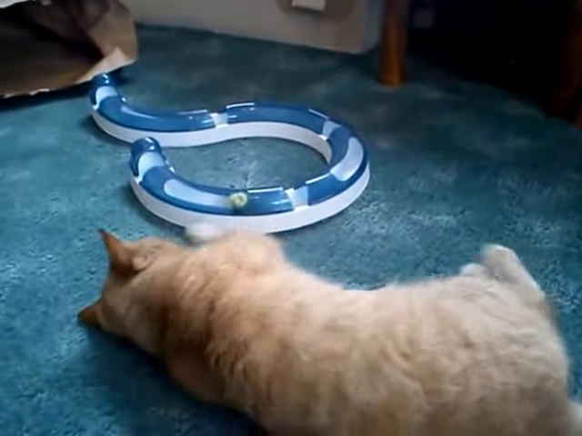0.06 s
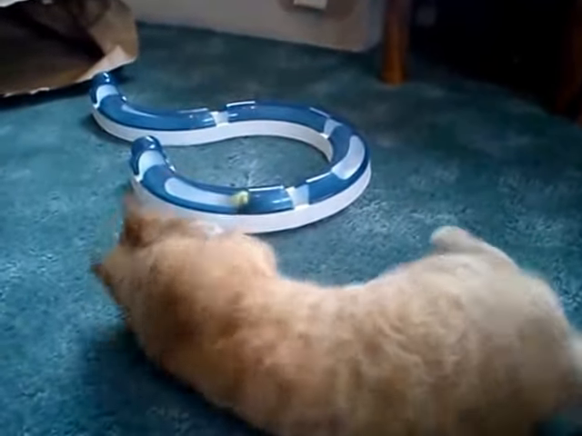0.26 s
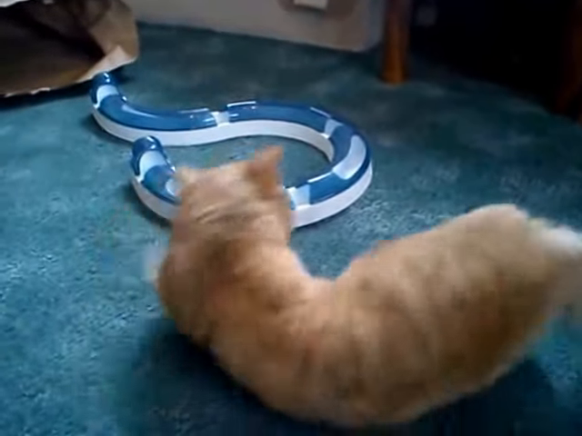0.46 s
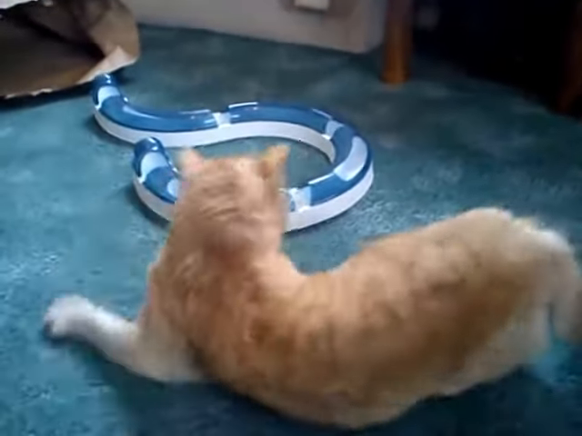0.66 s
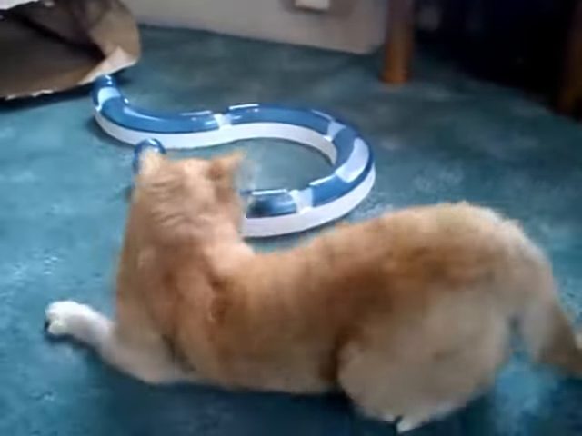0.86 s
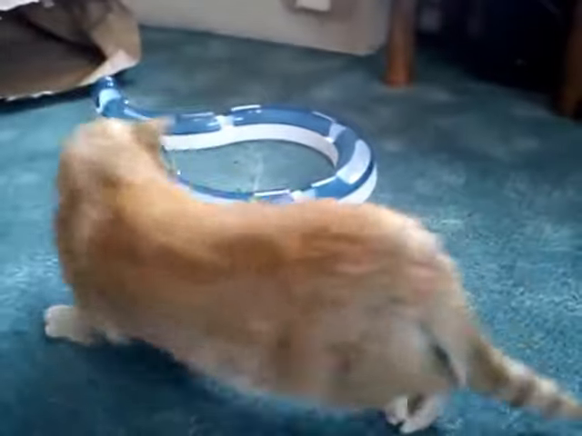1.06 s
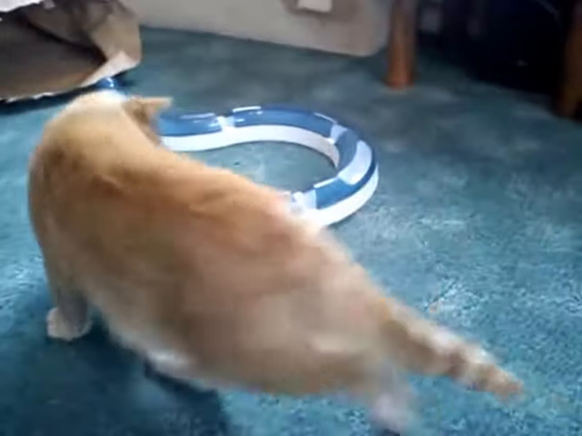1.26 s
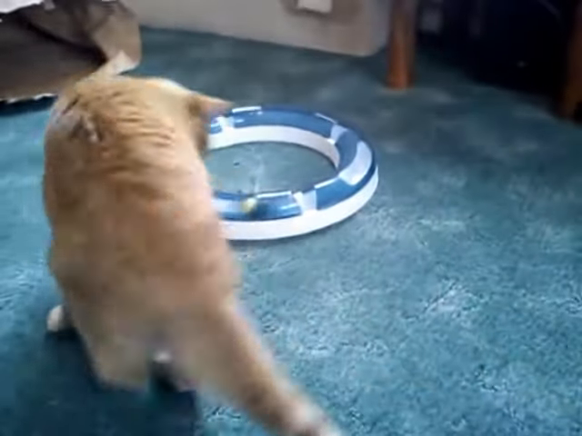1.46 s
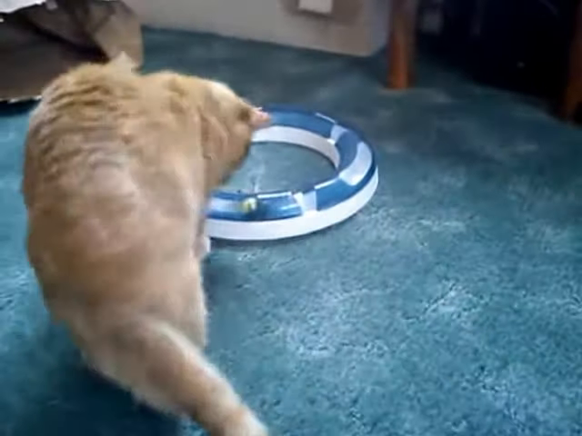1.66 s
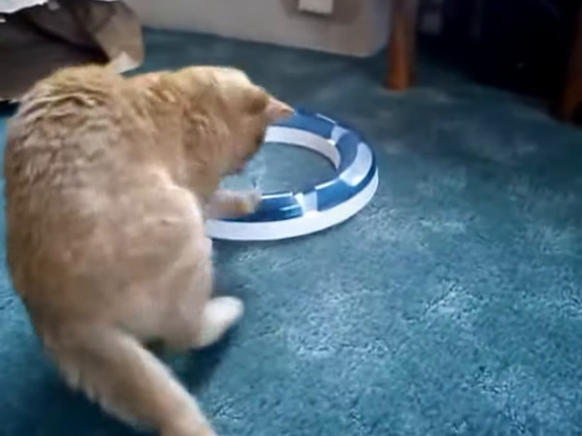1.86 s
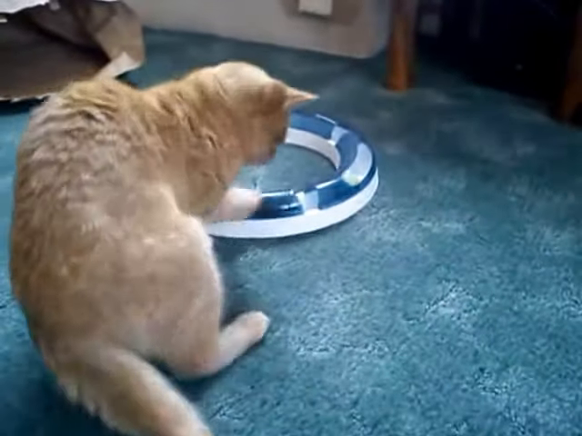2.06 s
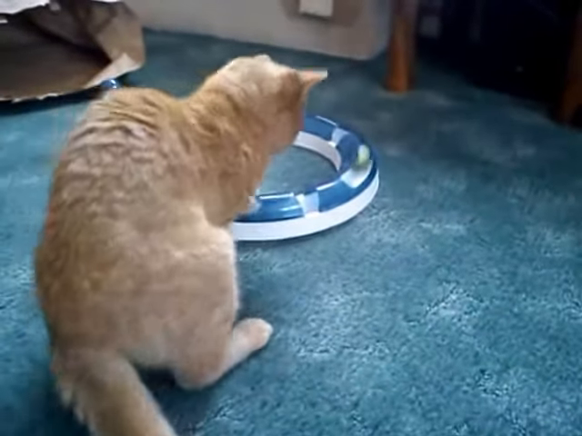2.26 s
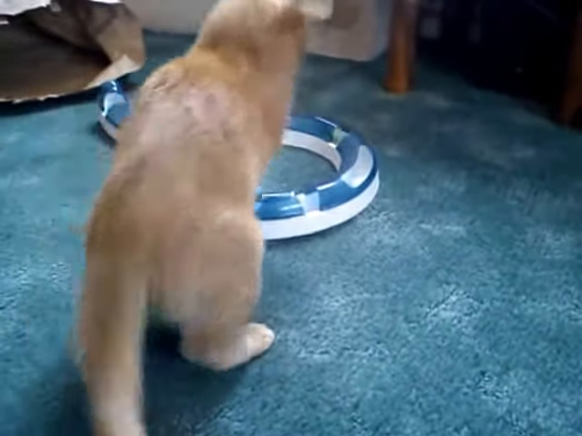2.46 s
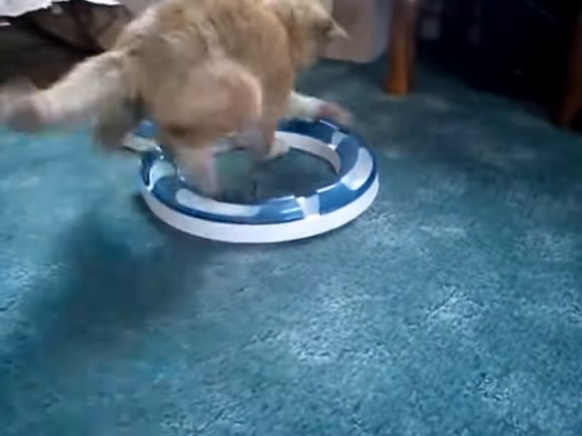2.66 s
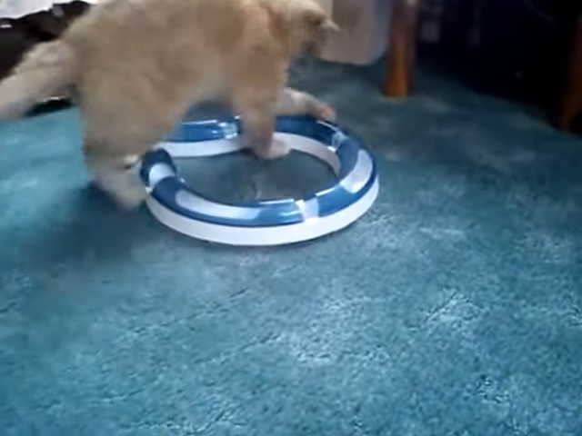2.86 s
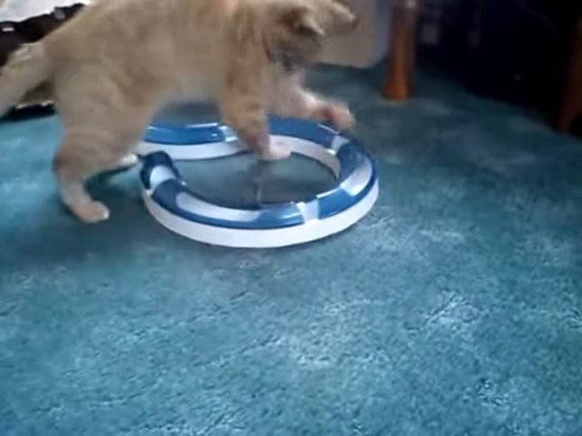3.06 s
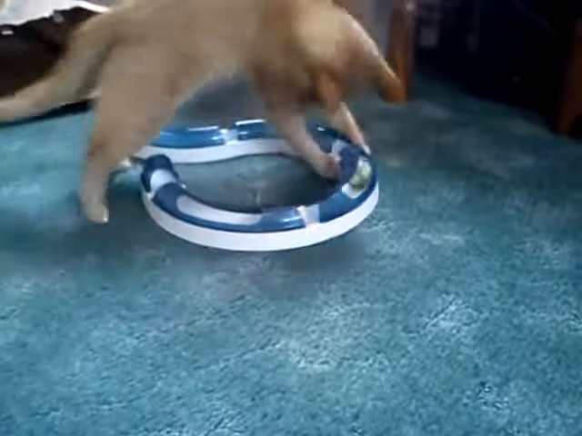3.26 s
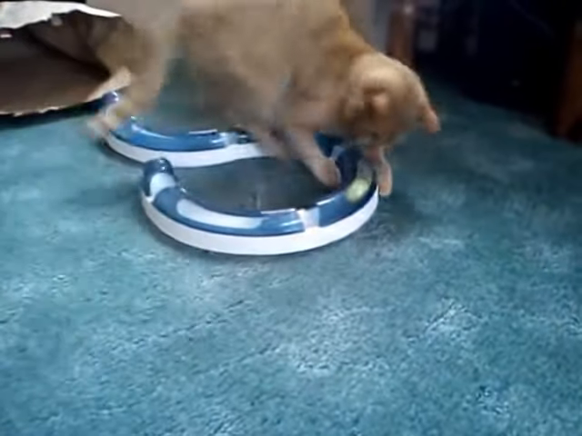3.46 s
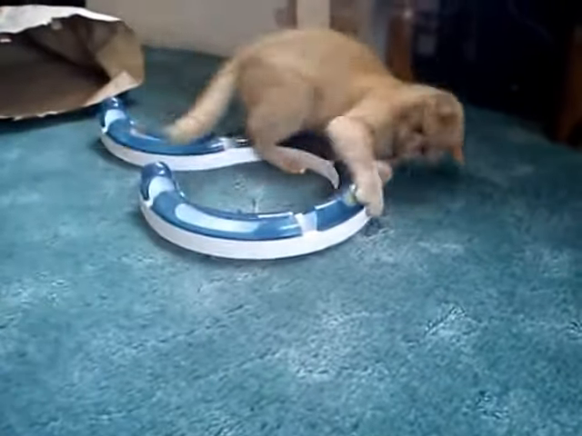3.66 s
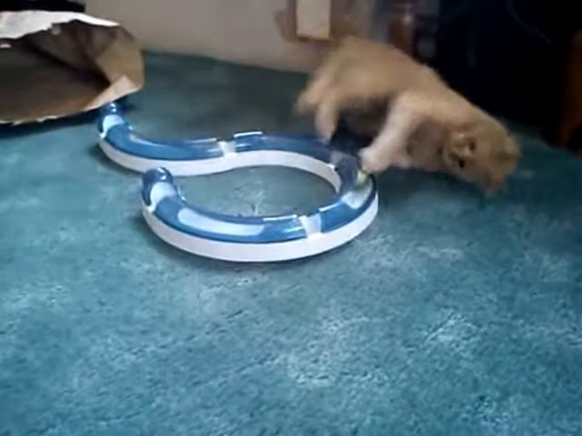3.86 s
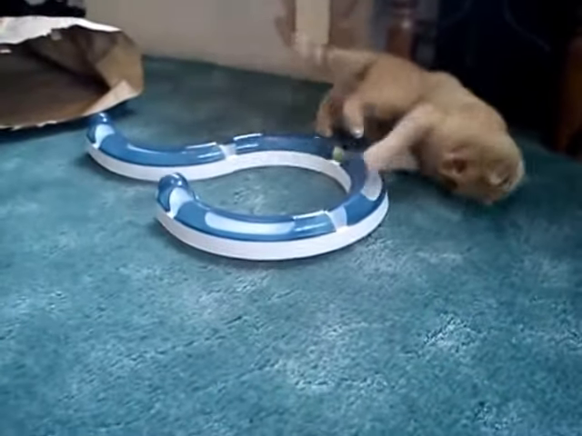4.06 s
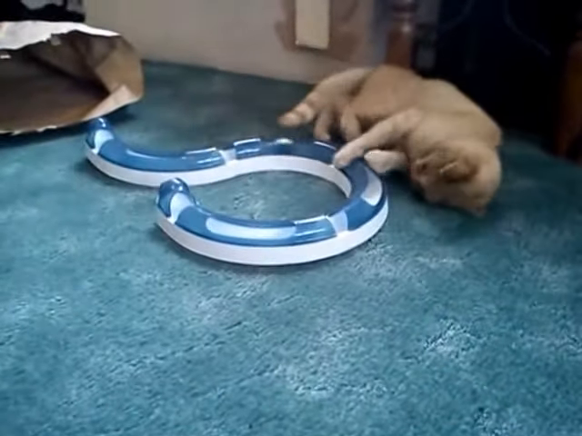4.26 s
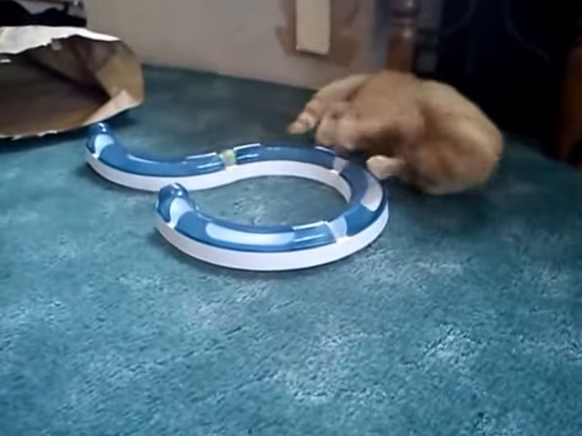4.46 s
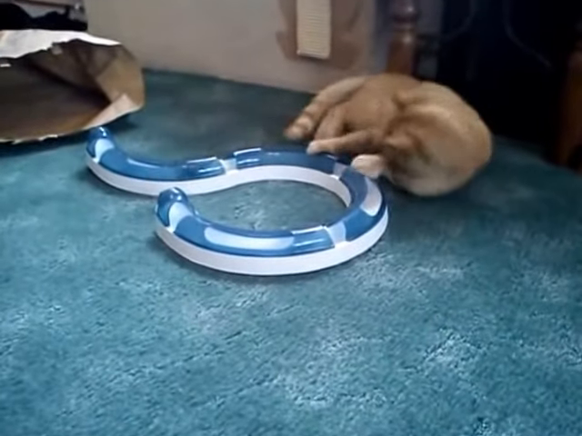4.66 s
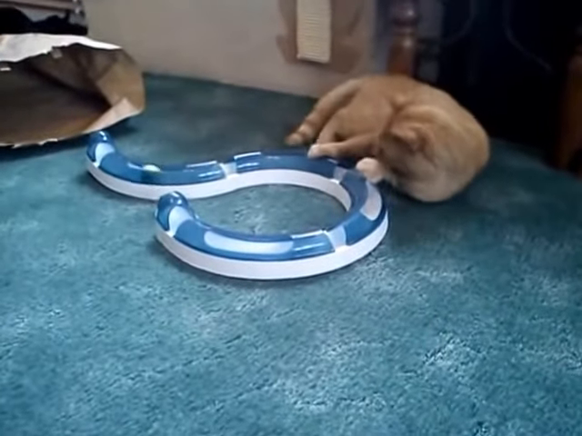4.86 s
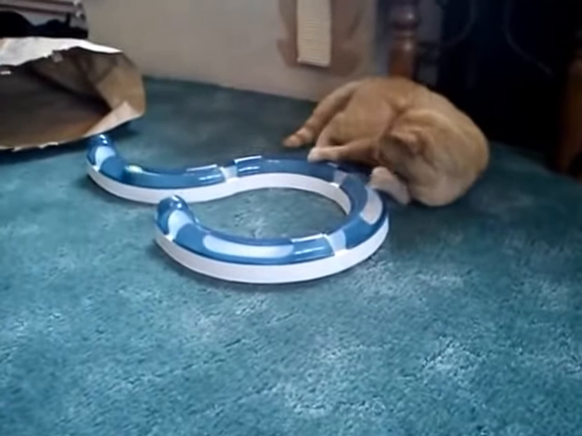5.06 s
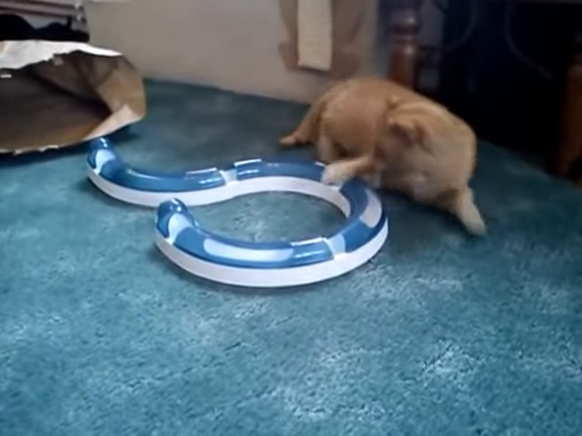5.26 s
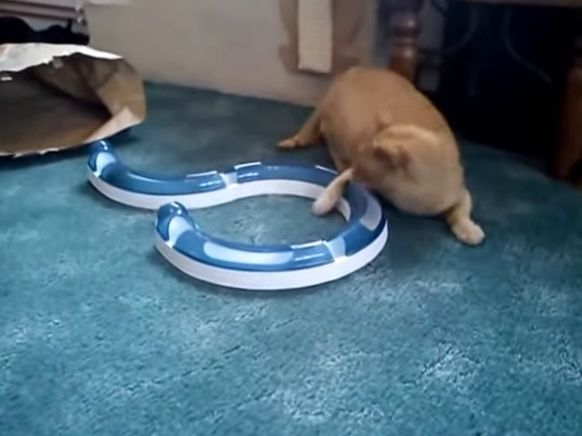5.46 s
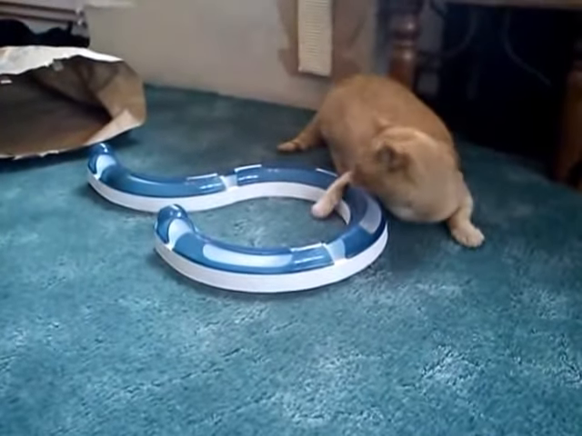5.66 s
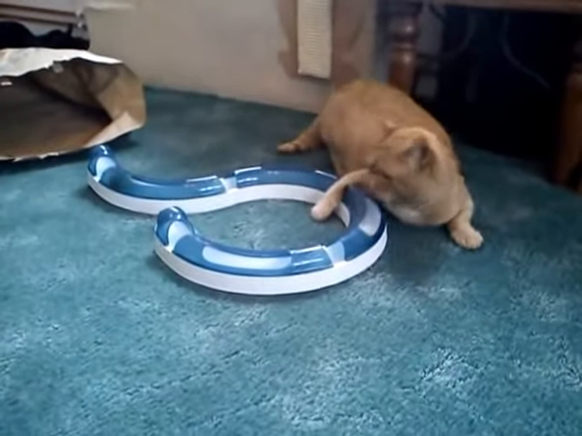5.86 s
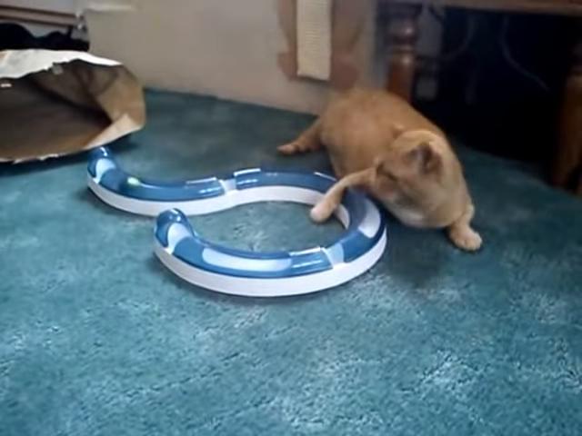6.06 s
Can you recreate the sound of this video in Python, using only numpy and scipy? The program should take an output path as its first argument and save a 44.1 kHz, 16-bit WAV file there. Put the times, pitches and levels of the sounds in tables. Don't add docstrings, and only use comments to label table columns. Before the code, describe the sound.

Steady microphone hiss and a faint low drone surround isolated plastic ticks and one early clack. After about two seconds, paw swats set a hard ball knocking and rattling through a thin plastic tube, its joints shaking. Strong cracks cluster midway, with muffled flops on carpet, then softer seam bumps trail off. Close, dry small-room sound, muffled above the midrange and distorted at peaks.

```python
import sys
import numpy as np
from scipy import signal
from scipy.fft import rfft, irfft
from scipy.io import wavfile
from scipy.ndimage import uniform_filter1d, minimum_filter1d

SR = 44100
rng = np.random.default_rng(int(sys.argv[2]) if len(sys.argv) > 2 else 0)


def elevation(decibels):
    levels = np.asarray(decibels, float)
    return 10 ** (levels / 20)


def transcribe(signal):
    frames = np.atleast_2d(signal).T
    limited = np.clip(frames, -1, 1)
    pcm = np.round(limited * 32767).astype(np.int16)
    wavfile.write(sys.argv[1], SR, pcm)


N = 269451

# f/Hz, level/dB, t60/s
TUBE_MODES = [(474, -7.5, 0.052), (603, -5.5, 0.033), (800, -3.5, 0.044), (938, 3, 0.016), (1220, 2, 0.028),
              (1380, -2.5, 0.0053), (1570, -5.5, 0.1), (1780, -8.5, 0.041), (2033, -6, 0.048),
              (2296, -0.5, 0.051), (2620, -7, 0.03), (2887, -6.5, 0.013), (3330, -11.5, 0.022),
              (3810, -10.5, 0.039), (4290, -1.5, 0.011)]
# t/s, rattle level/dB, f/Hz of the air column it closes
ROLL_PATH = [(1.9, -71, 1572), (1.98, -41, 1534), (2.2, -44, 1510), (2.3, -35, 1320), (2.49, -41, 1540),
             (2.72, -34.5, 1412), (2.8, -46.5, 1505), (3.28, -43, 1647), (3.4, -33.5, 1488),
             (3.58, -44.5, 1550), (3.8, -37, 1579), (4.01, -47.5, 1422), (4.26, -41, 1587),
             (4.61, -40.5, 1446), (4.79, -43.5, 1236), (4.86, -41, 1163), (4.96, -44, 1200),
             (4.99, -46, 1230), (5.055, -42.5, 1220), (5.12, -54, 1306), (6.11, -56, 1693)]
# f/Hz, level/dB
FILTER_SKIRT = [(3420, 0), (3650, -10), (4000, -19), (4300, -31), (4500, -42), (4800, -66), (5200, -95)]
TUBE_PITCH_HZ = 1750


def rms_one(x):
    return x / np.sqrt(np.mean(x ** 2) + 1e-20)


def in_time(rows):
    s, *columns = np.transpose(rows)
    return [np.interp(np.arange(N) / SR, s, column) for column in columns]


def high_pass(x, hz):
    return signal.sosfilt(signal.butter(2, hz, "high", fs=SR, output="sos"), x)


def ring(clicks, hz, t60):
    r, w = elevation(-60 / (t60 * SR)), 2 * np.pi * hz / SR
    return signal.lfilter([0, np.sin(w)], [1, -2 * r * np.cos(w), r * r], clicks + 1e-18)


def part_db(hz, low_db, bright_db, main_db):
    if hz < 900:
        return low_db
    return bright_db if hz > 2300 else main_db


def room(x):
    t60 = 0.21
    t = np.arange(round(.4 * SR)) / SR
    density = 2500 + 60000 * t
    echoes = rng.uniform(-1, 1, len(t)) * (rng.random(len(t)) < density / SR)
    onset = 1 - np.exp(-(t / 0.0043) ** 2)
    furnishings = np.exp(-(t / 0.43) ** 4)
    tail = echoes * elevation(-60 * t / t60) * furnishings * onset
    return signal.fftconvolve(x, tail / np.sqrt(np.sum(tail ** 2)))[:N]


def background():
    # f/Hz, density/dB per Hz
    hiss_colour = [(12, -86), (20, -39.5), (69, -18), (140, -5.5), (247, -8), (314, -9.5), (407, -11.5),
                   (445, -13.5), (785, -19), (1020, -18), (1540, -16), (3250, -17), (3700, -12),
                   (4810, -38.5), (8140, -120)]
    # t/s, level/dB
    drone_level = [
        (0.0, -65),
        (.44, -44),
        (1.87, -47),
        (2.05, -69.5),
        (4.6, -60.5),
        (5.3, -47),
        (5.68, -39),
        (5.92, -32.5),
        (6.11, -33),
    ]
    hz = np.maximum(np.arange(N // 2 + 1) * SR / N, 1)
    colour_hz, colour_db = np.transpose(hiss_colour)
    colour = np.interp(np.log(np.minimum(hz, FILTER_SKIRT[0][0])), np.log(colour_hz), colour_db)
    colour += 2.1 * np.exp(-((hz - 3330) / 220) ** 2)
    hiss = rms_one(irfft(rfft(rng.standard_normal(N)) * elevation(colour), N))
    points = N // 1500 + 2
    flicker = np.interp(np.arange(N) / 1500, np.arange(points), rng.standard_normal(points))
    hiss = hiss * elevation(.8 * flicker)
    drone = rms_one(ring(ring(rng.standard_normal(N), 145, 0.16), 142, 0.088))
    return elevation(-40) * hiss + elevation(in_time(drone_level)[0] - 16.5) * drone


def contacts():
    # t/s, peak level/dB, f/Hz
    claw_taps = [(.192, -48, 3430), (1.951, -24.5, 2780), (1.985, -26.5, 2750), (1.999, -25, 2860),
                 (2.027, -29.5, 2700), (.5855, -15, 2070), (.597, -17.5, 3420), (.611, -18.5, 3080),
                 (1.183, -23, 2620), (1.1945, -30, 3330), (2.1799, -15.5, 1735), (2.6373, -18.5, 1630),
                 (3.607, -18.5, 3445), (2.5794, -9.5, 2740), (2.599, -22.5, 2540), (3.0165, -11, 2880),
                 (3.6404, -17.5, 2315), (4.272, -19, 2440)]
    # t/s, peak level/dB, f/Hz, flight/s, loss per rebound/dB
    wall_hits = [(0.205, -21, 1780, 0.039, 10), (0.583, -10, 1700, 0.022, 7),
                 (2.1239, 1.5, 1367, .019, 7.5), (2.306, -14.5, 1354, 0.013, 23),
                 (3.0156, -6, 1810, .0216, 6.5), (3.1366, -6.5, 1550, 0.011, 6),
                 (3.4805, 1, 1539, .0194, 19), (3.7132, 0, 2110, 0.018, 7.5),
                 (3.8788, 0.5, 1454, 0.02, 5.5), (4.2762, -11.5, 1720, 0.016, 3.5),
                 (4.6735, -16.5, 960, 0.0074, 3)]
    # t/s, peak level/dB, f/Hz,
    # bright part level/dB
    paw_knocks = [(0.2063, -18.5, 2200, -16), (.2108, -24.5, 2210, -23), (.2225, -32, 2130, -24.5),
                  (1.945, -24, 1450, -12), (1.96, -28, 1600, -20), (2.0135, -14, 1450, -16),
                  (3.0375, -16.5, 1290, -23.5), (3.728, -12.5, 1730, -24), (1.9315, -21, 1510, -23.5),
                  (2.031, -22, 1570, -13), (2.0529, -5, 1560, -23), (2.0583, -5, 1585, -17),
                  (2.1005, -2.5, 1510, -30), (2.1068, -15, 1450, -3.5), (2.356, -24.5, 1334, -14),
                  (2.422, -20.5, 1570, -11), (2.5393, 4.5, 1580, -9.5), (2.55, -0.5, 1570, -15.5),
                  (2.5525, 0, 1380, -12.5), (2.7028, -10.5, 1326, -9), (2.9295, -4.5, 1570, -18),
                  (2.9425, -0.5, 1663, -14.5), (3.2596, -27, 1590, -25), (3.3016, -11, 2100, -9),
                  (3.3064, -2.5, 1270, -24.5), (3.3137, 5, 2060, -16.5), (3.3495, -6.5, 1393, -31),
                  (3.4165, 5.5, 1554, -21.5), (3.4697, 8.5, 1430, -26.5), (3.4742, -9, 1573, -24.5),
                  (3.6091, -3.5, 1517, -13.5), (3.6146, -1.5, 1534, -19), (3.6239, 4, 1926, -23),
                  (3.6878, -1, 1290, -15), (3.6912, 1.5, 1278, -20.5), (3.6946, 1.5, 1570, -20),
                  (3.6998, 1.5, 1484, -29), (3.701, -1.5, 1250, -2), (4.3569, -13.5, 1390, -21),
                  (4.3832, -18, 1490, -15)]
    # t/s, peak level/dB, f/Hz
    seam_bumps = [(.5736, -18, 1930), (.7545, -30, 1680), (.8734, -35.5, 2090), (1.2327, -28, 1030),
                  (1.2395, -30, 1500), (1.4195, -31, 1730), (1.4405, -30, 1720), (2.2233, -19, 1640),
                  (2.2582, -16, 1550), (2.4937, -14, 1570), (2.5138, -19, 2280), (2.9014, -31.5, 2220),
                  (3.2927, -13, 1427), (3.8347, -14, 1460), (3.8523, -42, 1570), (3.9697, -15, 1660),
                  (4.1696, -18.5, 1500), (4.3305, -19, 1050), (4.4531, -21, 1660), (4.5025, -18, 1360),
                  (4.515, -19, 1570), (4.5524, -20, 1630), (4.648, -20.5, 1930), (4.797, -22, 765),
                  (4.816, -27, 1220), (4.847, -23, 1160), (4.8695, -20, 1200), (4.889, -24.5, 1150),
                  (4.9122, -23, 1170), (4.94, -22, 1160), (4.9545, -28, 1380), (5.0055, -29.5, 1190),
                  (5.0422, -32, 1270), (5.14, -32, 1360), (5.238, -24, 910)]
    rebounds = []
    for s, db, hz, flight, loss_db in wall_hits:
        drifted_hz = hz + 0.37 * (TUBE_PITCH_HZ - hz)
        rebounds += [(s + k * flight, db - k * loss_db, drifted_hz) for k in (1, 2)]
    # hollow low part dB, bright part dB, echo dB
    kinds = [(wall_hits, (-25, -26.5, -10.5)), (rebounds, (-23.5, -24, -5)),
             (seam_bumps, (-4.5, -13.5, -5)), (claw_taps, (-36.5, -2.5, -6.5))]
    hard = [(s, db, hz, -22.5, bright_db, -9.5) for s, db, hz, bright_db in paw_knocks]
    return hard + [(*row[:3], *colour) for rows, colour in kinds for row in rows]


def knocks():
    s, db, hz, low_db, bright_db, echo_db = np.transpose(contacts())
    at, t = np.round(s * SR).astype(int), np.arange(1600) / SR
    chance = rng.standard_normal((len(at), len(TUBE_MODES), 2))
    rise = 1 - np.exp(-(t / 0.001) ** 2)
    cracks = high_pass(rng.standard_normal((len(at), len(t))) * np.exp(-t / 0.0016), 2400)
    burst = 0.63 * np.exp(-((t - .0012) / 0.0031) ** 2) + 0.027 * elevation(-60 * t / 0.046)
    direct, *sent = np.zeros((4, N + len(t)))
    for k, i in enumerate(at):
        tone = np.sin(2 * np.pi * hz[k] * t)
        walls = elevation(bright_db[k] + 6.0) * cracks[k]
        for (mode_hz, mode_db, t60), (luck, shift) in zip(TUBE_MODES, chance[k]):
            apart_db = -9.0 * abs(np.log2(mode_hz / hz[k]))
            share_db = part_db(mode_hz, low_db[k] + 11.0, bright_db[k] + 16.0, apart_db)
            decay = elevation(mode_db + share_db - 9.0 + 2.2 * luck - 74.0 * t / t60)
            moved_hz = mode_hz * (1 + 0.028 * shift)
            walls = walls + decay * np.sin(2 * np.pi * (moved_hz * t + shift)) * np.sign(luck)
        direct[i:i + len(t)] += elevation(db[k] - 4.5) * rise * (tone * burst + walls)
        to_room = 2.45 * tone * elevation(-60 * t / 0.0091) + 0.99 * walls
        sent[k % 3][i:i + len(t)] += elevation(db[k] + min(echo_db[k], -6.5)) * rise * to_room
    return direct[:N] + sum(room(place) for place in sent)


def snaps():
    # t/s, peak level/dB, f/Hz
    snap_hits = [(0.2097, -23, 2220), (0.5747, -22, 1540), (0.5836, -9, 1650), (0.594, -17, 1830),
                 (0.613, -18, 2230), (1.1815, -23, 2250), (1.2487, -24, 1540), (2.0385, -18, 1670),
                 (2.0566, -9, 1760), (2.1012, -8, 1640), (2.1452, -10, 1670), (2.2248, -18, 1740),
                 (2.2602, -16, 1400), (2.3637, -22, 1270), (2.4227, -18, 1310), (2.4952, -19, 1480),
                 (2.5146, -17, 1820), (2.538, -11, 2420), (2.5421, -4, 1780), (2.5529, -3, 1590),
                 (2.5806, -10, 2250), (2.6415, -17, 1690), (2.7033, -10, 1690), (2.7083, -14, 1500),
                 (2.9336, -9, 1660), (2.9451, -5, 2010), (3.0167, -7, 2290), (3.0214, -14, 2170),
                 (3.1379, -11, 1430), (3.153, -14, 1980), (3.1694, -15, 1510), (3.259, -20, 1460),
                 (3.3107, -5, 1820), (3.3222, -5, 1660), (3.3486, -2, 1650), (3.3522, -5, 1720),
                 (3.3783, -12, 1590), (3.422, -8, 1660), (3.54, -15, 1570), (3.6388, -7, 2050),
                 (3.6418, -8, 2110), (3.7041, -3, 1470), (3.8366, -17, 1180), (3.8524, -16, 1400),
                 (3.9, -6, 1780), (4.2742, -13, 1960), (4.2777, -20, 1740), (4.2896, -16, 1510),
                 (4.3645, -19, 1570), (4.491, -23, 1430), (4.5049, -21, 1610), (4.516, -17, 1650),
                 (4.5533, -19, 1520), (4.6452, -19, 1220), (4.6665, -17, 1650), (4.6757, -16, 1620),
                 (4.6883, -14, 1600), (4.6919, -14, 1480), (4.7037, -15, 1370), (5.2385, -27, 1430)]
    cycles = 0.69
    out, t = np.zeros(N), np.arange(-100, 101) / SR
    for s, db, hz in snap_hits:
        i = round(s * SR)
        wavelet = np.cos(2 * np.pi * hz * t) * np.exp(-(t * hz / cycles) ** 2)
        out[i - 100:i + 101] -= elevation(db - 1.5) * wavelet
    return out + room(elevation(-8) * out)


def thuds():
    # t/s, peak level/dB, f/Hz, t60/s
    landings = [(0.574, -40, 300, 0.4), (.583, -15, 520, 0.28), (2.703, -17, 750, 0.24),
                (3.136, -21.5, 700, 0.22), (2.539, -18, 197, 0.13), (3.297, -19.5, 333, 0.12),
                (3.61, -17.5, 167.5, .3), (3.617, -19, 95, 0.18), (3.31, -9, 820, 0.19),
                (3.692, -24, 328, 0.18), (3.899, -36.5, 243, 0.15), (3.99, -27, 168, 0.43),
                (3.997, -14, 295, 0.45), (4.031, -29, 178, 0.28), (4.057, -28, 150, 0.26)]
    out, t = np.zeros(N), np.arange(9000) / SR
    puffs = rng.standard_normal((len(landings), len(t)))
    for (s, db, hz, t60), puff in zip(landings, puffs):
        i = round(s * SR)
        body = rms_one(ring(ring(puff, hz, .008), .7 * hz, .006))
        rise = 1 - np.exp(-t / 0.00095)
        out[i:i + len(t)] += elevation(db - 14 - 60 * t / t60) * rise * body
    return out


def rattle():
    # t/s, rattle level/dB, bright part level/dB, t60/s, length/s
    swats = [(1.944, -52.5, 6, 1.8, .12), (2.032, -27.5, 2.5, 0.61, 0.11), (2.109, -27.5, 4.5, 0.35, 0.085),
             (2.496, -43, 8.5, 2, 0.069), (2.53, -29.5, 9.5, 0.36, 0.073), (2.699, -39, 6, 1.5, 0.086),
             (2.906, -43.5, 12, 3.7, 0.035), (2.924, -31.5, 9.5, 0.44, 0.068),
             (3.031, -32.5, 1, 0.39, 0.071), (3.127, -38.5, 9.5, 1.1, 0.081), (3.308, -24, 7, 0.31, 0.094),
             (3.464, -24, 1.5, 0.38, 0.078), (3.605, -25.5, 8.5, 0.32, .08), (3.883, -29.5, -1, 1.4, 0.3),
             (4.262, -39, 0, 0.77, 0.45), (4.64, -34, -0.5, 3.5, 0.097), (5.229, -46, 2, 0.64, 0.07),
             (1.228, -49, 2, 1, .065)]
    rise_s, stop_s, shake_low_db = 0.0027, 0.0038, -1.5
    t, (roll_db, column_hz) = np.arange(N) / SR, in_time(ROLL_PATH)
    octaves = np.log2(column_hz / TUBE_PITCH_HZ)
    main = elevation(2 * roll_db)
    low = main * elevation(2 * (1.5 + 12.0 * octaves))
    bright = main * elevation(2 * (-5 + 33.5 * octaves))
    for s, db, bright_db, t60, length in swats:
        age = np.maximum(t - s, 0)
        pinned = np.exp(-np.maximum(age - length, 0) / stop_s)
        power = (elevation(db - 60 * age / t60) * (1 - np.exp(-age / rise_s)) * pinned) ** 2
        main = main + power
        low = low + power * elevation(2 * shake_low_db)
        bright = bright + power * elevation(2 * bright_db)
    return 10 * np.log10(main), 10 * np.log10(low / main), 10 * np.log10(bright / main), column_hz


def rolling():
    db, low_db, bright_db, column_hz = rattle()
    moving = np.clip((np.arange(N) / SR - ROLL_PATH[0][0]) / 0.034, 0, 1)
    sizes = elevation(2.25 * np.minimum(rng.exponential(1, N), 3.5)) * rng.choice([-1, 1], N)
    ticks = sizes * (rng.random(N) < 2200.0 / SR)
    column = len(TUBE_MODES)
    dealt = rng.integers(0, column + 1, N)
    fade = elevation(-60 / (0.017 * SR))
    swell = signal.lfilter([1], [1, -2 * fade, fade ** 2], ticks * (dealt == column))
    out = elevation(db - 9.0) * rms_one(swell * np.sin(2 * np.pi * np.cumsum(column_hz) / SR))
    for k, (hz, mode_db, t60) in enumerate(TUBE_MODES):
        near_db = -1.5 - 14.0 * abs(np.log2(hz / column_hz))
        gain = elevation(db + mode_db + part_db(hz, low_db, bright_db, near_db) - 2.5)
        out = out + gain * rms_one(ring(ticks * (dealt == k), hz, 0.37 * t60))
    hardest = ticks * (np.abs(sizes) > 1.9)
    bare = rms_one(high_pass(ring(hardest, 1670, 0.003), 900))
    return moving * (out + elevation(db - 2.0) * bare)


def scene():
    ball = rolling()
    track = knocks() + snaps() + ball + room(elevation(-11.0) * ball)
    track = high_pass(track, 260)
    landing = high_pass(high_pass(thuds(), 63), 57)
    return (track + landing + background())[None]


def limiter(x):
    # t/s, level/dB above full scale
    slips = [
        (3.3145, .8),
        (3.348, .7),
        (3.4812, .45),
        (3.7003, 2.6),
        (3.7022, .5),
    ]
    ceiling = .715
    t = np.arange(N) / SR
    needed = np.minimum(1, .68 / (np.abs(x) + 1e-9))
    gain = minimum_filter1d(needed, size=161)
    gain = uniform_filter1d(uniform_filter1d(gain, size=81), size=81)
    held = x * gain
    for s, over_db in slips:
        near = np.abs(t - s) < .0015
        top = np.argmax(np.abs(held) * near)
        lift = ceiling * elevation(over_db) / abs(held[top])
        held = held * (1 + (lift - 1) * np.exp(-((t - t[top]) / .0015) ** 2))
    return np.clip(held, -ceiling, ceiling)


def low_pass(x):
    return signal.sosfilt(signal.butter(12, 15800, fs=SR, output="sos"), x)


def record(dry):
    hz = np.arange(N // 2 + 1) * SR / N
    skirt_db = np.interp(hz, *np.transpose(FILTER_SKIRT))
    narrow = irfft(rfft(dry[0]) * elevation(skirt_db), N)
    return low_pass(limiter(narrow)[None])


dry = scene()
out = record(dry)
transcribe(out)
```